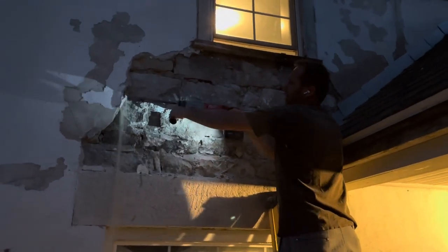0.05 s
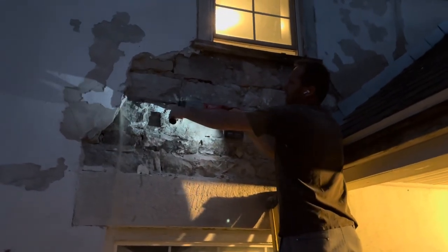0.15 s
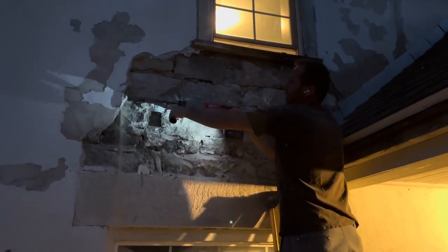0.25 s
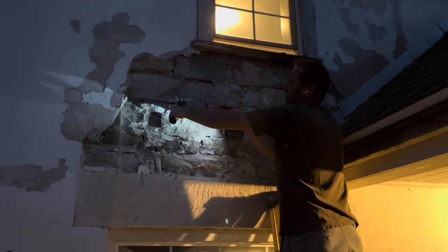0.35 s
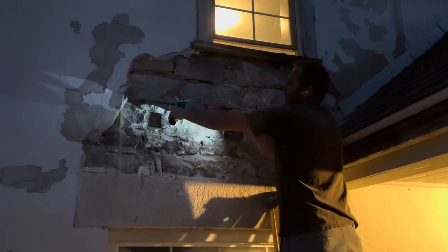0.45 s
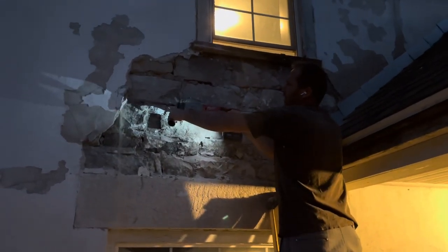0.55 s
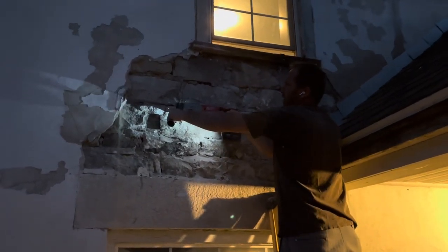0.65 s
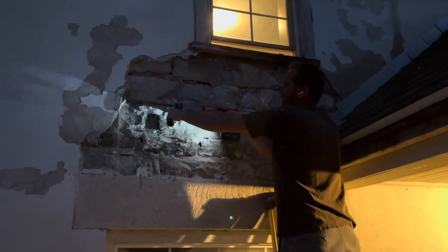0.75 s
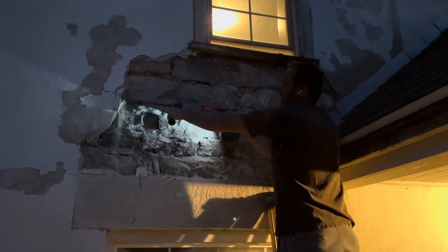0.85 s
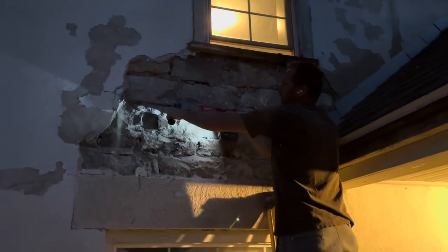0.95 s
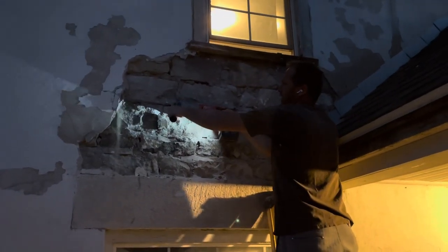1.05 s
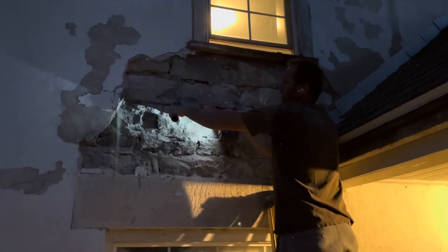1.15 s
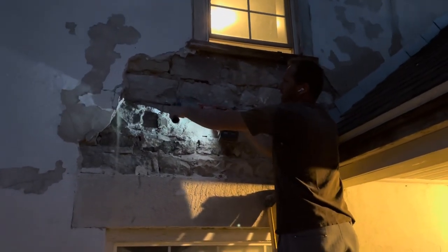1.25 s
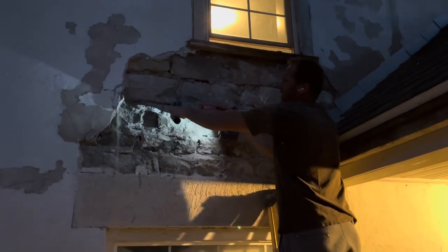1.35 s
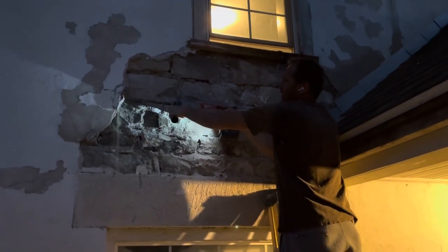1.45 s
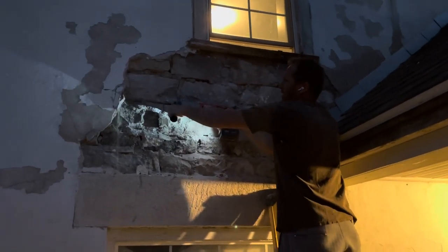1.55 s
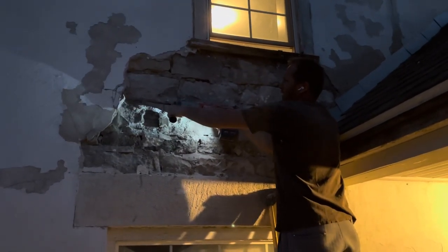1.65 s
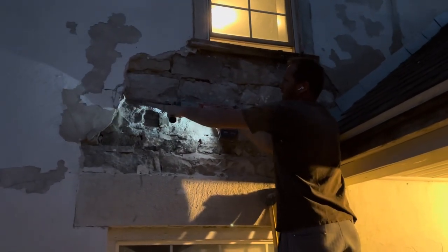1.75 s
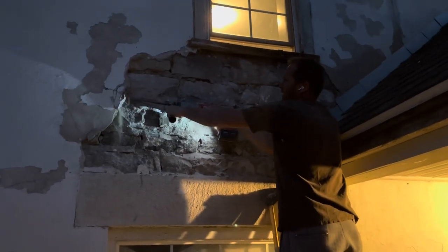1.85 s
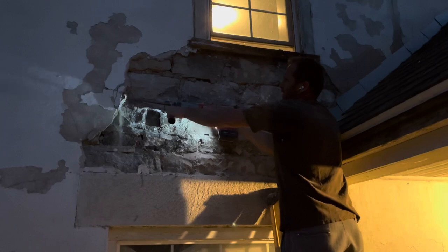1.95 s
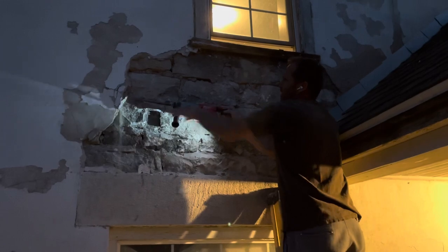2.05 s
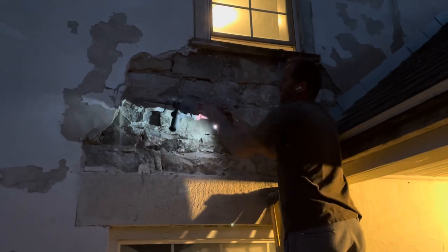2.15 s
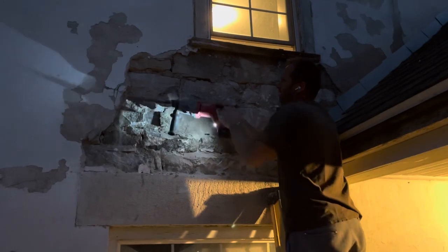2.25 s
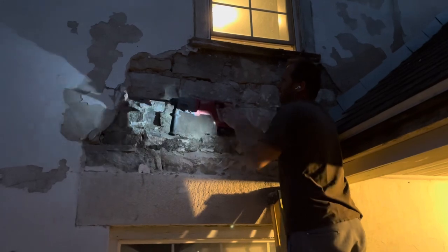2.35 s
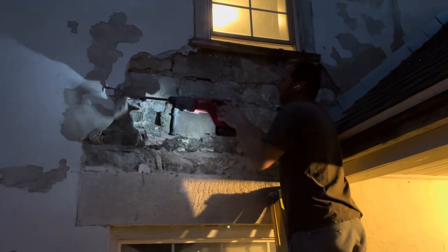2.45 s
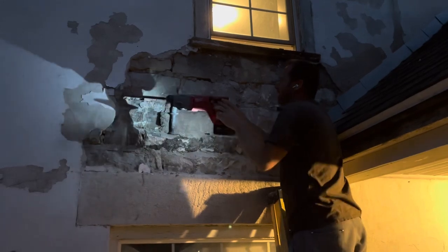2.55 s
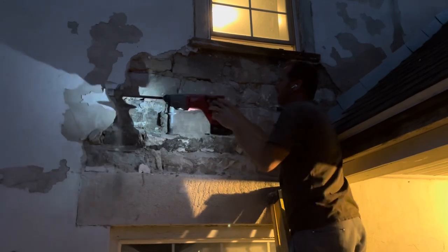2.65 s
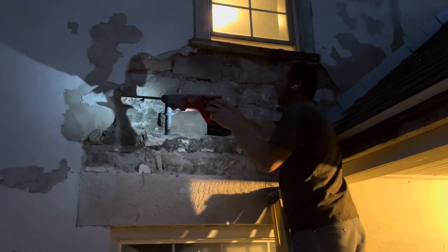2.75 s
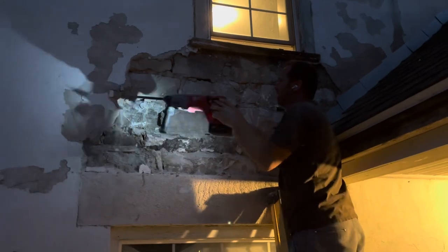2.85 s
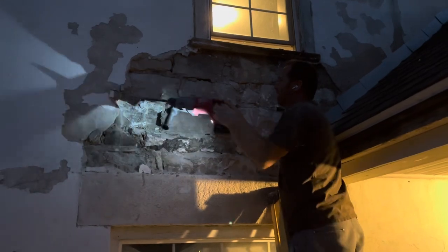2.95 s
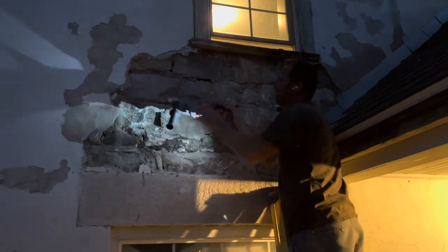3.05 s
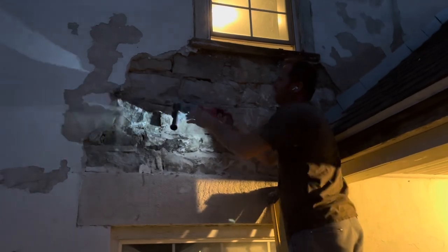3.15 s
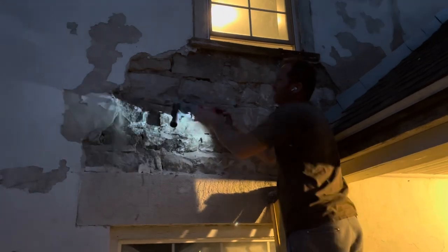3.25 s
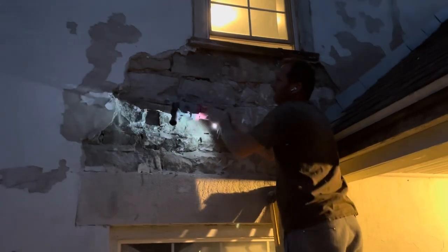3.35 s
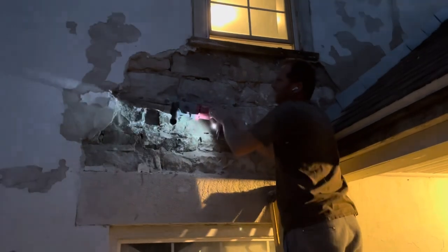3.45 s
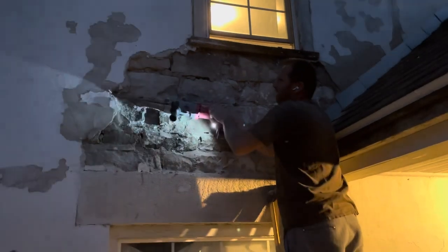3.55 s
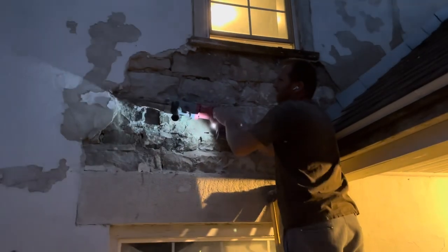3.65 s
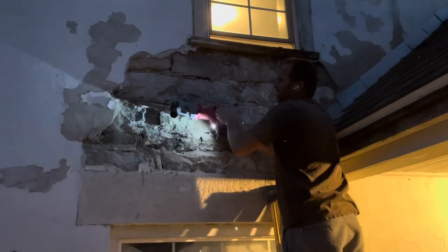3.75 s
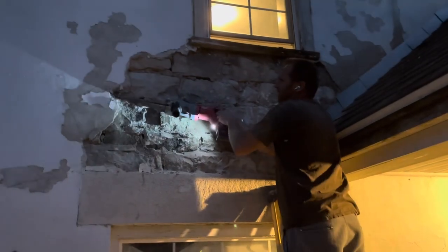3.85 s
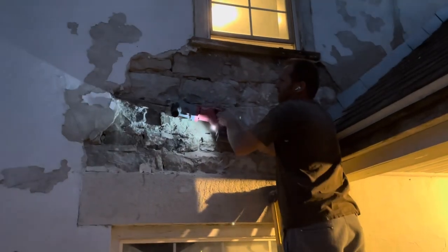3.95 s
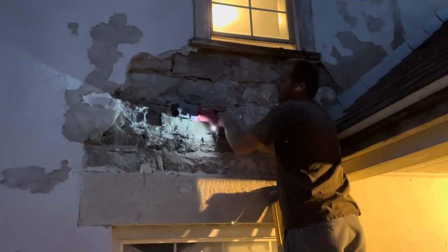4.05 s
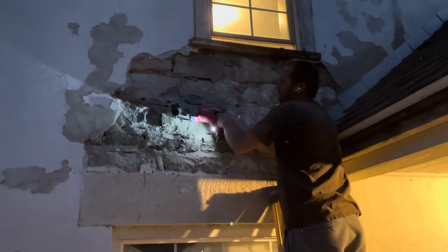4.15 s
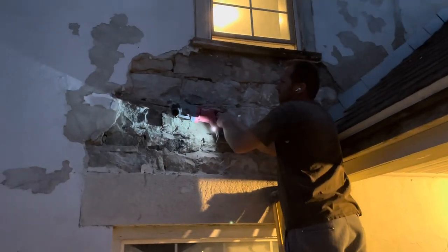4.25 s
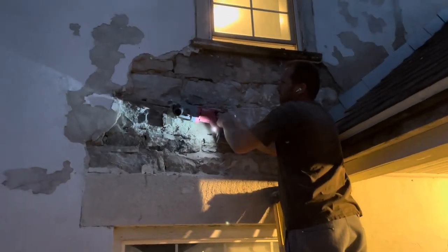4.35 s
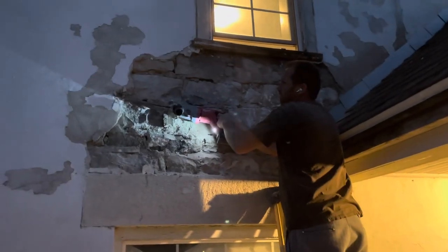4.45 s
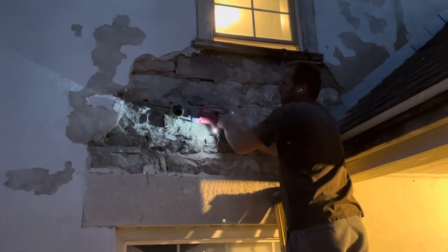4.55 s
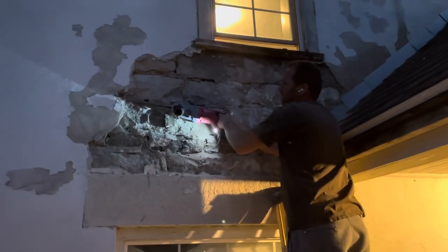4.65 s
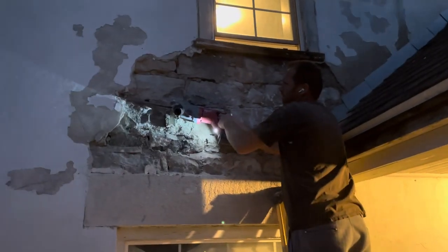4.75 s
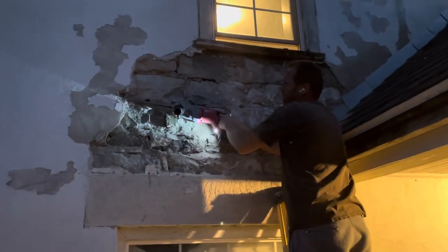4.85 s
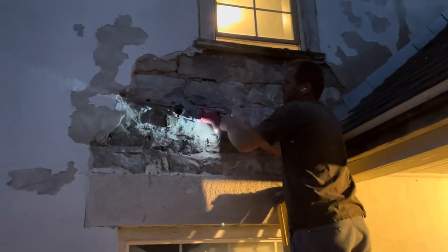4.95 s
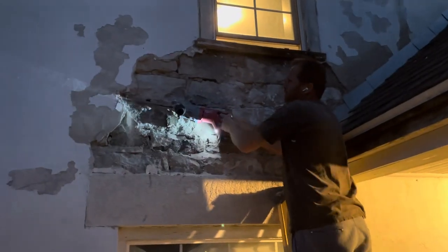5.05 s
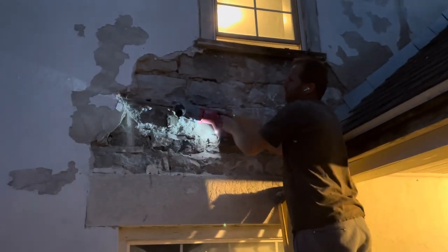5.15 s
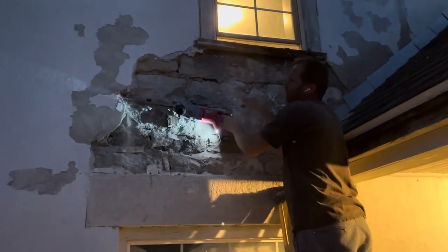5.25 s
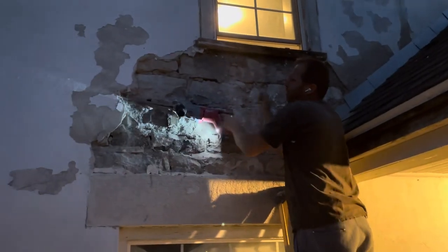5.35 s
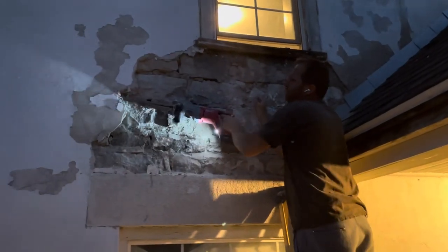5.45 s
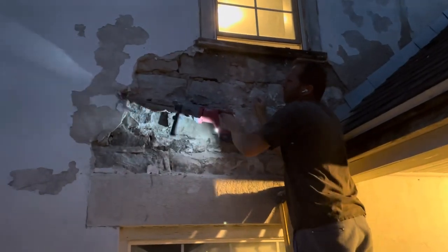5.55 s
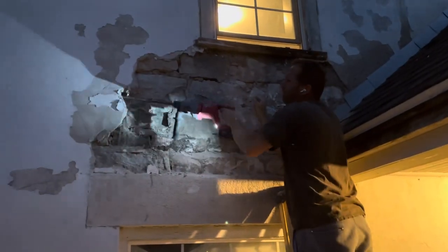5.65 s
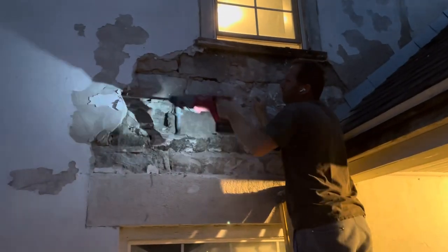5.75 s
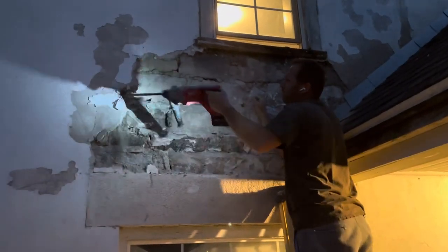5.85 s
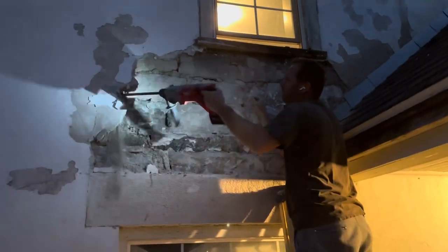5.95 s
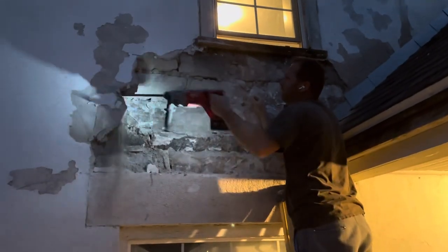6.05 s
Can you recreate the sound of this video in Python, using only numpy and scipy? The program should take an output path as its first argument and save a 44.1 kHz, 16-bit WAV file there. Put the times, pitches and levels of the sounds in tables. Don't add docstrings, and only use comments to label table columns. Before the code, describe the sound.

An electric hammer chips a stone wall in three hard, buzzing bursts outdoors, with grit ticking down and steel clinking on stone between them.

```python
import sys
import numpy as np
from scipy import signal
from scipy.fft import rfft, irfft, next_fast_len
from scipy.io import wavfile
from scipy.ndimage import uniform_filter1d, map_coordinates

SR = 44100
rng = np.random.default_rng(int(sys.argv[2]) if len(sys.argv) > 2 else 0)


def voltage_ratio(level):
    return 10 ** (np.asarray(level, float) / 20)


def output_pcm(signal):
    pcm = np.clip(np.atleast_2d(signal).T, -1, 1) * 32767
    wavfile.write(sys.argv[1], SR, np.round(pcm).astype(np.int16))


N = 269010
HZ = np.fft.rfftfreq(next_fast_len(N + SR // 8), 1 / SR)
TIME = np.arange(N) / SR
RATED = 75

# (pulled [s], first blow [s], let go [s])
PULLS = [
    (-1, .0045, .8041),
    (1.3308, 1.3808, 1.9558),
    (3.1981, 3.2481, 4.9071),
]
# (time [s], push [dB], free ring of the bit [dB], bite of the tip [dB], gear strain [dB])
GRIP = [(0, -5, -12.5, -33, -35.5), (.27, -1, -7.5, -21.5, -31), (.52, -1.5, -10.5, -23, -39),
        (.68, -1.5, -12, -21, -44), (.8, -3.5, -9, -24.5, -37), (1.03, -2, -14.5, -24, -39),
        (1.4, 1.5, -9.5, -28.5, -15), (1.58, 1, -8.5, -20, -76), (1.8, 1, -6, -18.5, -88),
        (1.89, 1, -13, -14.5, -57.5), (1.95, 0.5, -17.5, -14.5, -47), (2.08, 0.5, -10, -22.5, -47),
        (2.2, 1, -13, -31, -39), (3.25, -2.5, -7, -31, -40.5), (3.3, 1, -8.5, -30, -42),
        (3.42, 1, -10, -26.5, -47), (3.48, 1.5, -18, -30.5, -42.5), (3.6, 0.5, -11.5, -35, -41),
        (4, 3, -14.5, -15, -57.5), (4.2, 4, -14.5, -14, -58), (4.33, 2, -8, -13.5, -56),
        (4.4, 5.5, -3.5, -11.5, -45), (4.75, 5.5, -5, -10, -53.5), (4.82, 6, -4.5, -14.5, -54),
        (4.84, 3.5, -18, -7.5, -49), (4.92, 4.5, -9, -19.5, -41), (5.05, 1.5, -10, -21, -42.5)]
# (time [s], ring [Hz], ring t60 [ms], squeal [dB], looseness [dB])
CONTACT = [(0, 6950, 5.9, -38.5, 2), (.2, 6370, 6, -45, -3), (.6, 6510, 6.2, -34.5, -7.5),
           (.72, 6840, 14, -45, 0.5), (1.03, 7220, 8.5, -47.5, 1), (1.38, 7020, 14, -51, -9),
           (1.55, 7020, 6.5, -44, 2.5), (1.65, 6800, 3.5, -34, -1), (1.86, 7080, 3.8, -35, 1),
           (1.91, 6600, 2.3, -27, 2.5), (1.99, 6950, 5, -21, 8), (2.06, 6930, 5.1, -35.5, -2),
           (3.24, 6850, 17, -44.5, 2), (3.33, 7060, 11, -47.5, 3), (3.7, 6810, 7.4, -38, 6),
           (3.9, 7150, 3.7, -29.5, 4.5), (4.14, 7300, 6.2, -18, 2), (4.26, 7250, 3.5, -30.5, 3.5),
           (4.36, 7300, 6, -29, 4.5), (4.42, 7340, 2.9, -30, -4.5), (4.815, 7400, 4.4, -29.5, -3.5),
           (4.835, 7300, 5, -19.5, 6), (4.9, 7300, 3.8, -22, -2), (4.95, 7300, 6.1, -38, -4)]


def unit(x):
    return x / np.sqrt(np.mean(x ** 2) + 1e-20)


def along(points, hz=HZ):
    f, v = np.transpose(points)
    return np.interp(np.log(hz + 1), np.log(f + 1), v)


def curves(rows, at=TIME):
    s, *cols = np.transpose(rows)
    return [np.interp(at, s, c) for c in cols]


def wobble(rate):
    knots = rng.standard_normal(int(N * rate / SR) + 4)
    return map_coordinates(knots, [TIME * rate], order=2)


def lasting(rows, cols, size):
    return unit(uniform_filter1d(rng.standard_normal((rows, cols)), size=size, axis=0))


def filtered(x, response):
    m = 2 * (len(HZ) - 1)
    return irfft(rfft(x, m) * response, m)[..., :N]


def modes(table):
    h = 0
    for k, (c, w, db) in enumerate(table):
        h = h + (-1) ** k * voltage_ratio(db) * 1j * HZ * w / (c * c - HZ ** 2 + 1j * HZ * w)
    return h / np.abs(irfft(h)).max()


def bursts(s, shape):
    at = np.round(s * SR).astype(int)[:, None] + np.arange(shape.shape[1])
    return np.bincount(np.clip(at, 0, N).ravel(), shape.ravel(), N + 1)[:N]


def pair(spectrum=1):
    # (frequency [Hz], left-right likeness [-1..1])
    alike = [(60, .93), (200, 1), (600, 0.7), (1000, .75), (2000, .4), (4000, .1), (6000, .1), (7500, .8),
             (8000, .93), (9800, .93), (11000, .4), (13000, 0.9)]
    turn = np.arccos(np.clip(along(alike), -1, 1)) / 2
    return spectrum * np.array([np.cos(turn), np.sin(turn)])


def left_right(mid, side):
    return np.array([mid + side, mid - side])


def crank():
    # (time [s], speed [turns per s])
    full_speed = [(0, 75.32), (0.8, 74.65), (1.4, 75.8), (1.8, 74.87), (2, 74.5), (3.3, 74.64),
                  (4.2, 74.31), (4.45, 75.23), (4.75, 75.08), (4.95, 74.61)]
    spin_up_s, spin_up_bend = .0661, 1.747
    coast_s, coast_bend = .1489, 1.224
    stall = 8.5
    turns, speed, blows = np.zeros(N), np.zeros(N), []
    for on, first, off in PULLS:
        rise = 1 - np.exp(-(np.maximum(TIME - on, 0) / spin_up_s) ** spin_up_bend)
        coast = np.exp(-(np.maximum(TIME - off, 0) / coast_s) ** coast_bend)
        v = curves(full_speed)[0] * rise * coast
        turn = np.cumsum(v) / SR
        turn = turn - np.interp(first, TIME, turn)
        blows.append(np.interp(np.arange(int(turn[v > stall].max()) + 1), turn, TIME))
        turns = np.where(TIME >= on, np.ceil(turns.max()) + 2 + turn, turns)
        speed = np.where(TIME >= on, v, speed)
    return turns, speed, np.concatenate(blows)


def hammer():
    # (centre [Hz], width [Hz], level [dB])
    wall_modes = [(378, 82.5, 0.5), (514, 120, 1), (603.7, 58.6, 1)]
    body_modes = [(766, 55, 1), (1230, 260, -7.5), (1710, 112, -3.5), (2137, 170, -9), (2650, 330, -10.5),
                  (2830, 300, -6.5)]
    bit_modes = [(4960, 1800, -11), (5443, 500, -8.5), (6580, 280, -5), (7300, 825, 0), (8700, 1300, -0.5)]
    tip_modes = [(5300, 420, 2), (10900, 860, -1), (15000, 1300, -18.5)]
    jam_modes = [(13730, 620, -3), (12500, 1500, -9.5)]
    # (time [s], wall [dB], steel [dB])
    uneven = [(.85, -5, -2), (.868, -1.5, -2), (.887, -2, 1.5), (.911, 1, 0), (.939, 3.5, 2),
              (.978, 4.5, 4), (1.034, -1, -1.5), (1.38, -2, -2.5), (1.402, -1, -1.5), (2.042, -3.5, 0.5),
              (2.066, 1.5, 0.5), (2.095, 3, 2.5), (2.135, 2, 3), (2.197, 3, -1), (3.248, -11, -4),
              (3.27, -2, -4.5), (3.288, 0, -1.5), (3.304, 0, -5), (3.319, 2.5, -2), (3.333, 2.5, 0),
              (3.346, -2.5, 3), (3.36, 3, -1.5), (3.373, 3, 2), (3.387, -4, -5), (3.4, 1.5, 3.5),
              (3.413, 3, 1.5), (3.575, 2, 4), (3.588, 0.5, 3), (3.602, 0.5, 3), (3.682, 2.5, 4.5),
              (3.695, 0.5, -1), (3.762, -1.5, 0.5), (4.961, 3, 4.5), (4.979, 1, 3), (5.0, 4.5, 2.5),
              (5.025, 4, 2), (5.057, 7, 1.5), (5.104, 4.5, -4), (5.175, -2, -11)]
    # (thud [dB], knock [dB], bit [dB], tip [dB])
    slow_loss = (4.5, 0.86, 1.35, 4.2)
    # (thud [dB], knock [dB], bit [dB], tip [dB])
    nudge_loss = (12.5, 6.4, 5.7, 17)
    nudge_speed = 24.5
    thud_lead_s, knock_lead_s, crack_lead_s = .001, .0026, .0008

    _, speed, s = crank()
    late = np.maximum(RATED / np.interp(s, TIME, speed) - 1, 0)
    nudged = late > RATED / nudge_speed - 1
    push, ring, bite, _ = curves(GRIP, s)
    ring_hz, ring_ms, squeal, loose = curves(CONTACT, s)
    when, wall_db, steel_db = np.transpose(uneven)
    listed = np.abs(s[:, None] - when) < .006
    wall_db, steel_db = listed @ wall_db, listed @ steel_db
    luck = voltage_ratio(loose)[:, None] * rng.standard_normal((len(s), 5))
    s = s + .00003 * luck[:, 0]

    def landed(db, k, spread):
        return db - slow_loss[k] * late - nudge_loss[k] * nudged + spread * luck[:, k + 1]

    thud = landed(-20 + push + wall_db, 0, 0.4)
    knock = landed(-14.5 + 0.48 * bite + wall_db, 1, 0.6)
    bit = landed(ring + steel_db, 2, 0.8)
    tip = landed(bite + steel_db, 3, 0.9)
    t = np.arange(500) / SR
    size = (len(s), len(t))

    def crunch(db, t60):
        grain = .9 * lasting(*size, size=10) + .42 * rng.standard_normal(size)
        fade = voltage_ratio(db[:, None] - 60 * t / t60) * np.minimum(t / 0.00039, 1)
        return bursts(s - crack_lead_s, fade * grain)

    bass_cut = (1j * HZ / (330 + 1j * HZ)) ** 3
    wall = filtered(bursts(s - thud_lead_s, voltage_ratio(thud + 3)[:, None]), modes(wall_modes) * bass_cut)
    blow = bursts(s - knock_lead_s, voltage_ratio(knock + 3.5)[:, None])
    housing = filtered(blow + crunch(knock - 16, 0.021), modes(body_modes))
    note_fade = voltage_ratio((bit - 2.5)[:, None] - 69000.0 * t / np.abs(ring_ms)[:, None])
    note_fade = note_fade * np.minimum(t / 0.00047, 1)
    note = bursts(s - crack_lead_s, note_fade * np.sin(2 * np.pi * ring_hz[:, None] * t))
    jam = filtered(crunch(squeal + tip - bite, 0.011), modes(jam_modes))

    fall_back = voltage_ratio((bit - 21)[:, None] - 60 * t / 0.0073) * np.clip(late - 1.1, 0, 1)[:, None]
    rebound = bursts(s + .0108, fall_back * rng.standard_normal(size))
    steel = filtered(crunch(bit - 9, 0.006) + rebound, modes(bit_modes))
    tip = tip + 0.42 * ring
    snap = bursts(s - crack_lead_s / 2, voltage_ratio(tip - 2.5)[:, None])
    crushing = filtered(crunch(tip - 5, 0.0071) + snap, modes(tip_modes))
    return wall + housing + steel + crushing + note + jam


def motor():
    gear_teeth = (12, 13, 15, 19, 11, 22, 1, 2, 3, 4, 34)
    # (frequency [Hz], level [dB per Hz])
    whirr_tone = [(150, -29.5), (400, -3), (1000, 5.5), (2000, -3), (3000, 2.5), (4000, -3), (7000, -7.5),
                  (9000, -1), (13000, -9), (15500, -34), (16800, -73)]
    # (frequency [Hz], level [dB per Hz])
    clatter_tone = [(150, -11.5), (400, -11), (1000, 0.5), (1600, -7), (2600, -6), (3300, -5.5),
                    (5300, -26.5), (8000, -21.5)]
    # (time after the pull [s], level [dB])
    start_whine = [(0, -98.5), (.008, -45), (.03, -42), (.06, -41.5), (.11, -47.5), (.17, -86)]
    # (time [s], low [dB], middle [dB], high [dB], idler [dB])
    mesh = [(0, -34, -34, -53, -47.5), (.4, -34, -34.5, -50.5, -41), (.8, -37.5, -37.5, -47.5, -50),
            (1.4, -43.5, -35, -38.5, -55), (1.7, -55, -36.5, -47, -53), (1.95, -37.5, -35.5, -28.5, -51.5),
            (3.3, -36, -29, -34, -45.5), (3.6, -38, -33.5, -34, -47), (3.85, -43.5, -35, -33, -44.5),
            (4.15, -47, -35, -31, -35), (4.35, -49.5, -35.5, -32.5, -33.5), (4.45, -47, -33.5, -56.5, -35),
            (4.9, -41, -34.5, -55, -38)]
    # (second [dB], third [dB])
    rock_db = (-49, -46.5)

    turns, speed, _ = crank()
    push, _, bite, strain = curves(GRIP)
    loose = curves(CONTACT)[3]
    whirr = -33.5 + 0.84 * push - 0.066 * bite + 1.43 * 20 * np.log10(speed / RATED + 1e-6)
    load = 3.04 * np.cos(2 * np.pi * turns + 0.76) + 0.8 * wobble(60)

    pattern = lasting(int(turns[-1]) + 1, 590, size=36)
    clatter = pattern[turns.astype(int), (turns % 1 * 590).astype(int)]
    clatter = unit(filtered(np.clip(speed / 70, 0, 1) * clatter, voltage_ratio(along(clatter_tone))))
    mid, side = filtered(rng.standard_normal((2, N)), pair(voltage_ratio(along(whirr_tone))))
    hiss = unit(left_right(mid, side))
    rough = 1.136 * voltage_ratio(0.95 * loose) * hiss

    under = strain - 6.5
    twin = -26.5 + bite - loose
    shake = -85 - 0.44 * strain
    fourth = -51.5 - 1.5 * push
    fan = -42.5 + 1.7 * push
    levels = (*curves(mesh), under, twin, shake, *rock_db, fourth, fan)
    gears = 0
    for teeth, db in zip(gear_teeth, levels):
        strength = voltage_ratio(db + 2.5 + 0.2 * wobble(17))
        gears = gears + strength * np.sin(2 * np.pi * teeth * turns + 0.2 * wobble(20))
    gears = gears * (speed / RATED) ** 5

    armature = unit(filtered(rng.standard_normal(N), modes([(3040, 300, 0)])))
    pinion = voltage_ratio(-6) * np.sin(2 * np.pi * 70 * turns)
    spin_up = sum(voltage_ratio(curves(start_whine, TIME - on)[0] - 5.5) for on, _, _ in PULLS)
    return voltage_ratio(whirr + load) * (rough + 0.69 * clatter) + gears + spin_up * (armature + pinion)


def taps():
    # (time [s], peak [dB], ring [Hz], bright part [dB], fizz
    # [dB])
    touches = [
        (3.072, -20, 1040, -14, -13),
        (3.184, -33.5, 1100, -19, -7.5),
        (5.1765, -33.5, 703, -10.5, -24),
        (5.182, -39.5, 1000, -6, -16),
        (5.612, -32.5, 2090, 4.5, -37.5),
    ]
    # (time [s], pitch [Hz], level [dB])
    slips = [(6.06, 1570, -89), (6.063, 1500, -50), (6.072, 1790, -48.5), (6.079, 1840, -59),
             (6.09, 1670, -93)]
    s, db, hz, bright, fizz = (c[:, None] for c in np.transpose(touches))
    t = np.arange(5000) / SR
    fade = voltage_ratio(db - 60 * t / 0.042) * np.minimum(t / 0.0014, 1)
    damped = voltage_ratio(-60 * t / .016)
    tones = 1.95 * np.sin(2 * np.pi * hz * t) + voltage_ratio(bright + 2.5) * np.sin(4.1 * np.pi * hz * t)
    ring = bursts(s[:, 0], fade * damped * tones)
    scrape_tone = [(60, -30.0), (170, -1.5), (500, -1.5), (1150, 3.0), (2200, -7.0), (4000, -11.0), (16000, -17.0)]
    rough = bursts(s[:, 0], fade * rng.standard_normal(fade.shape))
    scrape = filtered(rough, voltage_ratio(along(scrape_tone)))
    sizzle = filtered(bursts(s[:, 0], voltage_ratio(fizz) * fade * rng.standard_normal(fade.shape)), HZ > 5000)

    first_s, gap_s, slows = 5.2165, .0155, 1.19
    s = first_s + gap_s * (slows ** np.arange(6) - 1) / (slows - 1)
    knocks = bursts(s, voltage_ratio(-54 + rng.standard_normal((len(s), 1))))
    bounce = filtered(knocks, modes([(6840, 300, -1), (7140, 230, -0.69)]))

    pitch, level = curves(slips)
    slip = 2 * np.pi * np.cumsum(pitch) / SR
    squeak = np.sin(2 * np.pi * 1680 * TIME) + 0.51 * np.sin(2 * slip) + 0.5 * np.sin(3 * slip)
    squeak = squeak + 0.13 * np.sin(4 * slip) + 0.3 * rng.standard_normal(N)
    squeak = voltage_ratio(level) * squeak * (level > -84)
    return ring + 1.95 * scrape + 1.7 * sizzle + bounce + squeak


def grit():
    # (time [s], peak [dB], pitch [Hz], dull part [dB])
    crumbs = [(1.1629, -58, 5250, -2), (1.1882, -50, 3240, 4), (1.276, -56, 10100, -21),
              (1.292, -56, 11900, 6.5), (1.325, -49, 3240, 1), (2.4303, -46, 12000, -15),
              (2.5356, -52, 11100, -17), (2.627, -53, 9700, -13), (2.666, -35, 10900, -31),
              (2.7025, -42, 6400, -15.5), (2.795, -41.5, 10600, -18), (2.9304, -51, 11160, -12),
              (2.9544, -52, 10800, -17), (2.9783, -48, 11300, -11), (3.0549, -45, 3450, -16),
              (5.1584, -44.5, 3130, 7.5), (5.182, -45.5, 5250, 2.5), (5.413, -50.5, 3420, -11),
              (5.4522, -50.5, 3510, 3.5), (5.5724, -43.5, 10840, -19), (5.5972, -41, 4400, 4),
              (5.667, -52.5, 4600, -17), (5.7397, -43.5, 10900, -16), (5.8002, -52, 12500, -10),
              (5.8813, -50, 10600, -12), (5.904, -47.5, 9000, -9), (6.006, -52, 8000, -18),
              (3.118, -39.5, 8450, -11), (5.969, -53.5, 12360, -12), (6.0244, -48, 10100, -13)]
    s, db, hz, dull = (c[:, None] for c in np.transpose(crumbs))
    t = np.arange(900) / SR
    crackle = np.diff(rng.standard_normal((len(s), len(t) + 1)))
    tick = voltage_ratio(-60 * t / 0.013) * (.5 * np.sin(2 * np.pi * hz * t) + 1.53 * crackle)
    knock_hz = rng.uniform(900, 2400, s.shape)
    knock = voltage_ratio(dull - 60 * t / 0.019) * np.sin(2 * np.pi * knock_hz * t)
    return bursts(s[:, 0], voltage_ratio(db - 6.0) * (tick + knock))


def dust():
    # (time [s], coarse [dB], fine [dB])
    shakes = [(0.999, -59, -91), (2.151, -61, -75), (3.08, -54, -60), (5.149, -62.5, -88.5),
              (5.43, -63.5, -79), (5.52, -61.5, -85), (5.61, -62, -73.5)]
    s, coarse, fine = (c[:, None] for c in np.transpose(shakes))

    def trickle(db, fall_db_per_s):
        rise = np.clip((TIME - s) / 0.01, 0, 1)
        return (voltage_ratio(db - fall_db_per_s * np.abs(TIME - s)) * rise).max(axis=0)

    def grains(hz, width):
        sparse = rng.standard_normal(N) * voltage_ratio(4 * wobble(330) + 3 * wobble(25))
        return unit(filtered(sparse, modes([(hz, width, 0)])))

    return trickle(coarse, 51.5) * grains(3040, 1100) + trickle(fine + 5, 7.5) * grains(10600, 1900)


def stone(x):
    # (frequency [Hz], level [dB])
    scatter = [(700, -30), (2000, -11), (3000, -6), (5000, -5), (6500, -7), (7700, -13), (9900, -13),
               (11000, -9), (13500, -15)]
    tail = rng.standard_normal((2, 500)) * voltage_ratio(-60 * TIME[:500] / .014)
    tail = tail / np.linalg.norm(tail, axis=1, keepdims=True)
    delay = np.exp(-2j * np.pi * HZ * .0012)
    return filtered(x, rfft(tail, 2 * (len(HZ) - 1)) * voltage_ratio(along(scatter)) * delay)


def yard(x):
    # (frequency [Hz], t60 [s])
    decay = [(200, 0.27), (700, 0.41), (1000, 0.32), (2000, 0.21), (4000, 0.028), (12000, 0.037)]
    hz, t, z = signal.stft(rng.standard_normal((2, SR // 2)), SR, nperseg=256)
    tail = signal.istft(z * voltage_ratio(-60 * t / along(decay, hz)[:, None]), SR, nperseg=256)[1]
    tail = tail / np.linalg.norm(tail[0])
    wash = signal.fftconvolve(np.pad(x, (250, 0))[None], tail, axes=1)[:, :N]
    mid, side = filtered(wash, pair(HZ / (HZ + 1200)))
    echo = filtered(x, np.exp(-2j * np.pi * HZ * .0113))
    return voltage_ratio(-17) * echo + voltage_ratio(-7.0) * left_right(mid, side)


def air():
    # (frequency [Hz], level [dB per Hz])
    air_tone = [(13, -56.5), (22, -33), (50, -4), (81, 2), (237, -9), (330, -17.5), (1350, -16.5),
                (2490, -31.5), (7110, -38), (8630, -10), (11400, -39), (15000, -40.5), (16300, -46.5)]
    # (time [s], level [dB])
    air_level = [(0.0, -55), (6.1, -53.5)]
    # (time [s], level [dB])
    hum_level = [(1.13, -100), (1.17, -62), (1.28, -63), (1.31, -96)]
    mid, side = filtered(rng.standard_normal((2, N)), pair(voltage_ratio(along(air_tone))))
    drone = voltage_ratio(curves(hum_level)[0]) * np.sin(2 * np.pi * 610 * TIME + .5 * wobble(14))
    level = voltage_ratio(curves(air_level)[0] + 2.0 * wobble(5.5))
    return level * unit(left_right(mid, side)) + drone


def scene():
    # (time [s], level [dB])
    facing = [(0, 2), (.9, 2.5), (1.4, 2), (2.2, 1), (3.25, -3.5), (3.9, -3), (4.3, 1), (5.1, 0.5),
              (6.1, -0.5)]
    point = hammer() + grit() + taps() + dust()
    hum = motor()
    near = point + hum.mean(axis=0)
    return point + hum + stone(voltage_ratio(curves(facing)[0]) * near) + yard(near) + air()


def roll_off(x):
    return signal.sosfilt(signal.butter(12, 16450, fs=SR, output="sos"), x)


def record(dry):
    # (frequency [Hz], lead of the left port [rad])
    left_lead = [(0, .3), (1400, .9), (3800, 1.4), (5500, .3), (6900, -1.6), (7800, -2.95), (8300, -3.12),
                 (9700, -3.2), (10400, -4.3), (11600, -5.1), (12500, -6.1), (16000, -6.4)]
    # (frequency [Hz], left minus right [dB])
    left_level = [(60, .5), (200, -.5), (700, 3), (1300, 1.5), (4400, 3.5), (6500, 2.5), (8000, 0),
                  (15000, 0)]
    # (frequency [Hz], level [dB])
    colour = [(60, 0), (7600, 0), (8800, -3), (10200, 0), (14300, 0), (15200, -4), (16300, -14),
              (17000, -60)]
    f, lead = np.transpose(left_lead)
    skew = voltage_ratio(along(left_level) / 2) * np.exp(.5j * np.interp(HZ, f, lead))
    ports = filtered(dry, np.array([skew, 1 / skew]) * voltage_ratio(along(colour) - 1.33))
    return roll_off(ports)


dry = scene()
out = record(dry)
output_pcm(out)
```